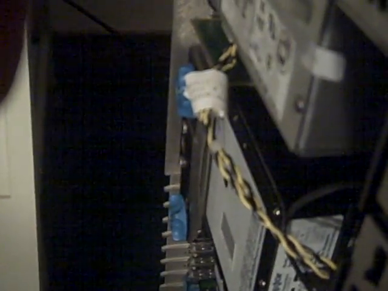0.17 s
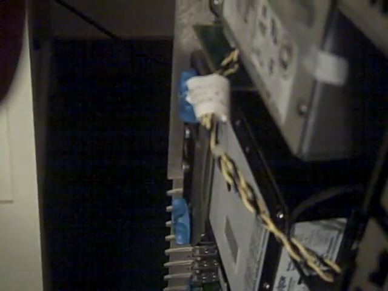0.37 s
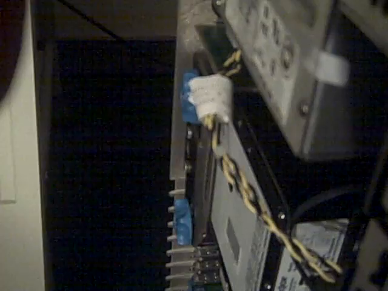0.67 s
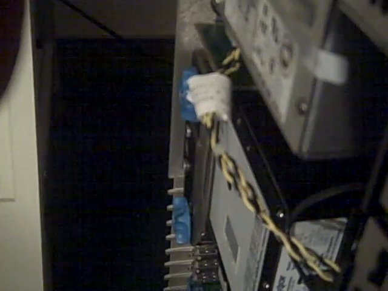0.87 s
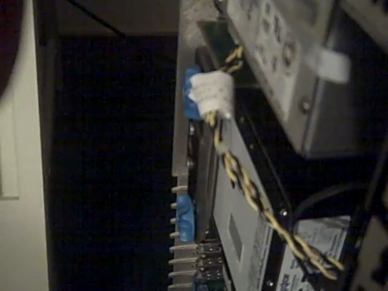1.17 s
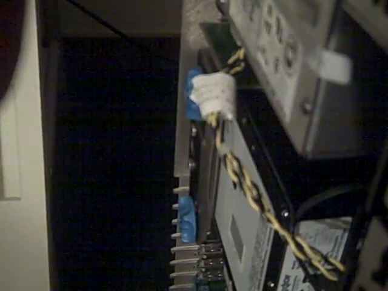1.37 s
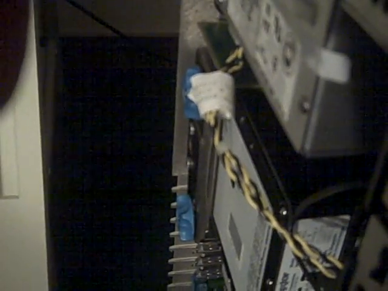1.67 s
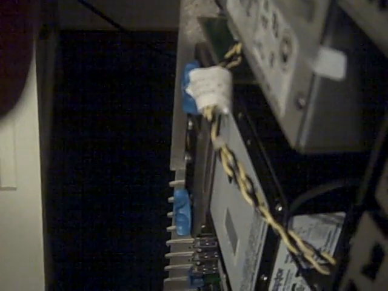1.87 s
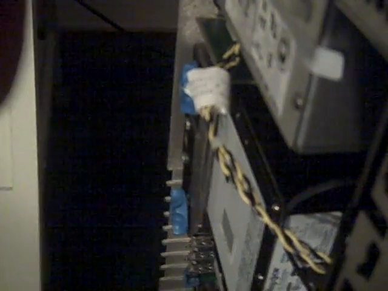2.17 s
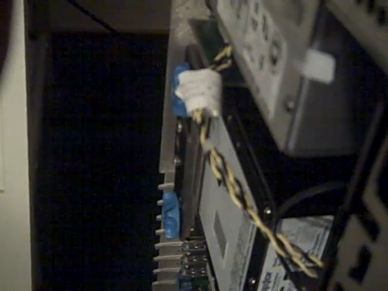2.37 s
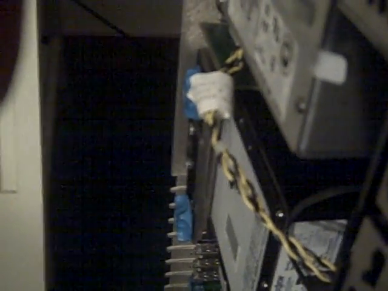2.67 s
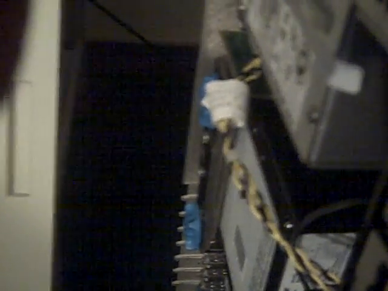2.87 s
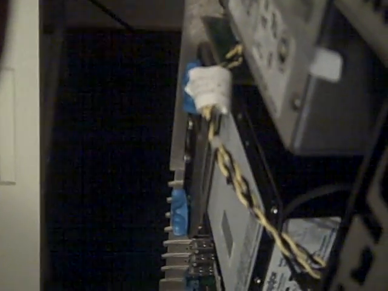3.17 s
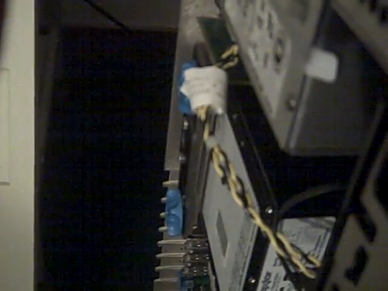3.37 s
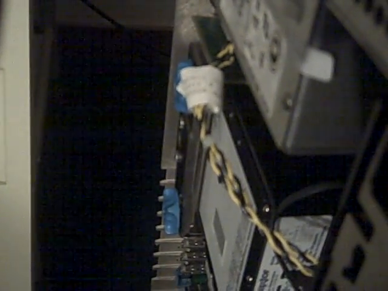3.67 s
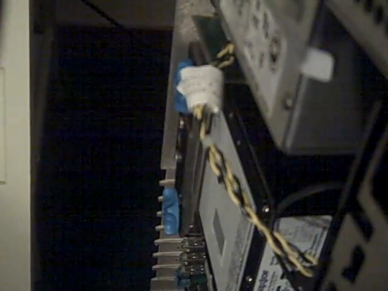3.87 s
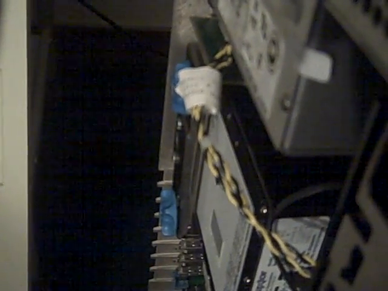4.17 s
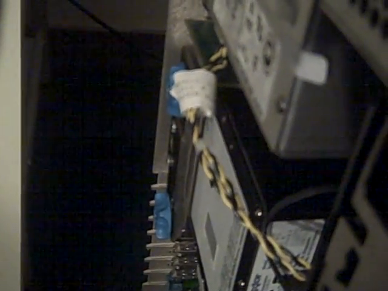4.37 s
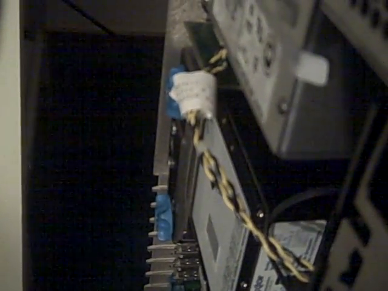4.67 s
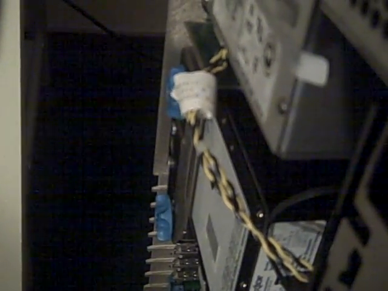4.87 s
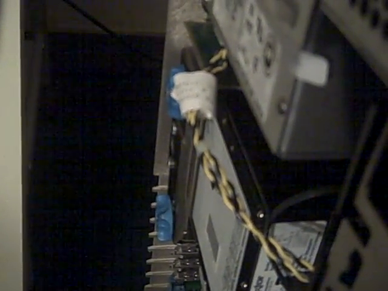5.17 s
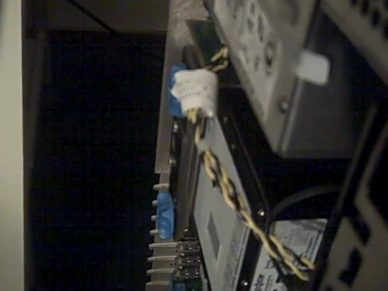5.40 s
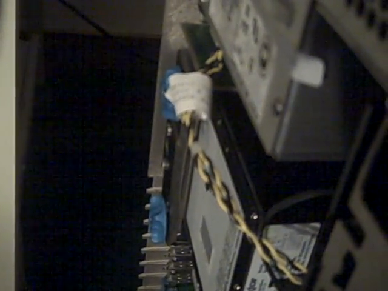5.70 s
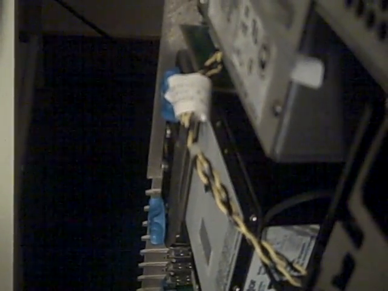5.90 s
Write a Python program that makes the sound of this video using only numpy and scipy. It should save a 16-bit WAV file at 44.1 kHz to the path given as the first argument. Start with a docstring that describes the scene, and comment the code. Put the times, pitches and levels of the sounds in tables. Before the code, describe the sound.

Close single microphone, small indoor room with a short reverb. Faint low room noise and a light press come before a hard, clattering switch click. The background ducks briefly and returns in tiny steps. Fan hum rises and levels into airy whoosh, a crisp latch tick cuts through, and later a drive motor whines upward with throbbing hiss.

```python
"""Desktop computer switched on

A finger presses the power switch of an open computer in a quiet room: filtered noise snaps and steel modes ring.
Two fans run up as gliding blade tones over rushing air; the hard drive ticks twice through its latch and cover,
then its spindle gathers speed as motor and bearing orders over a throbbing hiss. The gain control of a nearby
camera ducks at the snap and climbs back in small steps, each one a faint low thump."""
import sys
import numpy as np
from scipy import signal
from scipy.fft import rfft, irfft
from scipy.io import wavfile
from scipy.ndimage import uniform_filter1d

SR = 44100
rng = np.random.default_rng(int(sys.argv[2]) if len(sys.argv) > 2 else 0)


def wav_out(sig):
    """Save sig, one row per channel (or a flat mono array), as 16-bit PCM at SR to the path in sys.argv[1]."""
    wavfile.write(sys.argv[1], SR, np.round(np.clip(np.atleast_2d(sig).T, -1, 1) * 32767).astype(np.int16))


N = 266275
T = np.arange(N) / SR
HZ = np.fft.rfftfreq(N, 1 / SR) + 1e-3  # kept above zero for logs and divisions

# Colour of a hard snap, shared by switch and latch. Each row: frequency in Hz, relative density in dB per Hz.
SNAP_COLOUR = [(150, -34), (250, -10), (1020, -10), (1450, -6.5), (1910, -1), (2130, -9), (2530, -6.5),
               (3650, -15), (4570, -11), (5730, -16), (7980, -13.5), (12500, -26), (16000, -35)]


def undb(db):
    """Decibels to gain."""
    return 10 ** (np.asarray(db) / 20)


def level(x, db):
    """Scale to an rms level in dB."""
    return x * undb(db) / np.sqrt(np.mean(x ** 2))


def read(table, at):
    """Straight lines between (Hz, value) rows on a log frequency axis."""
    rows = np.array(table)
    return np.interp(np.log(at), np.log(rows[:, 0]), rows[:, 1])


def lifts(peaks, hz):
    """Gain of resonances, rows of (Hz, width Hz, lift dB), standing on a flat response."""
    return 1 + sum((undb(db) - 1) / (1 + (2 * (hz - f) / width) ** 2) for f, width, db in peaks)


def walk(rate):
    """Random levels held 1 / rate s and slewed twice; spread near 1."""
    hold = int(SR / rate)
    steps = np.repeat(rng.standard_normal(N // hold + 1), hold)
    return 1.3 * uniform_filter1d(uniform_filter1d(steps, hold), hold)[:N]


def coloured(gain):
    """Steady noise of the given colour, rms 1."""
    return level(irfft(rfft(rng.standard_normal(N)) * gain, N), 0)


def bands(gain, envelope):
    """Coloured noise in overlapping bands an octave apart, each under its own envelope(centre Hz)."""
    noise = rfft(rng.standard_normal(N)) * gain
    noise /= np.sqrt(2 * np.sum(np.abs(noise) ** 2)) / N  # rms 1 before the envelopes
    out = 0
    for hz in 20 * 2. ** np.arange(11):
        share = np.clip(1 - np.abs(np.log2(HZ / hz)), 0, 1)
        out = out + envelope(hz) * irfft(noise * share, N)
    return out


def burst(s, rise, decay):
    """Envelope that rises straight, holds for one more rise time and dies away exponentially."""
    t = T - s
    return np.clip(t / rise, 0, 1) * np.exp(-np.clip(t - 2 * rise, 0, None) / decay)


def tone(phase, db, waver_db=0.0):
    """A sine around rms level db that wavers slowly."""
    return np.sqrt(2) * undb(db + waver_db * walk(4.967)) * np.sin(phase + rng.uniform(0, 2 * np.pi))


def ring(push, modes, beat_db=0.):
    """Resonances that gather the energy of a rattling push and let it die away."""
    beats_per_s = 30  # rate of the wavering, where there is any
    out = 0
    for hz, db, t60 in modes:
        keep = np.exp(-2 * np.log(1000) / (t60 * SR))
        energy = signal.lfilter([.01], [1, -keep], push ** 2)
        gain = undb(db + beat_db * walk(beats_per_s))
        out = out + gain * np.sqrt(energy) * np.sin(2 * np.pi * hz * T + rng.uniform(0, 2 * np.pi))
    return out


def quiet_room():
    """Steady low-heavy noise with two faint resonant peaks, each band drifting a little in level."""
    # The room's colour. Each row: frequency in Hz, relative density in dB per Hz.
    colour = [(12, -44), (20, -10.5), (35, -14), (146, -20), (542, -26.5), (678, -12), (1000, -19),
              (2020, -21), (2530, -24.5), (3950, -27.5), (8890, -34), (10200, -33), (16000, -36)]
    # Faint hums in the noise. Each row: frequency in Hz, width in Hz, lift in dB.
    hums = [(479.5, 52, 16), (1950, 82, 9.5)]
    return undb(-66) * bands(undb(read(colour, HZ)) * lifts(hums, HZ), lambda hz: undb(0.79 * walk(3.5)))


def small_sounds():
    """Plunger squeaks and thin whistles are short sines; a low bump and faint rustles are shaped noise."""
    # Rubs of the plunger. Each row: start in seconds, level in dB, rise in seconds, decay in seconds.
    squeaks = [(.245, -64, .014, .005), (.868, -55, .0012, .003)]
    # Whistles that arch up and down. Each row: time at the top in seconds, top in Hz,
    # bend in Hz per second squared, half length in seconds, level in dB.
    whistles = [(3.11, 8400, 45000, .14, -85), (3.13, 9950, 40000, .14, -85),
                (5.58, 13650, 85000, .09, -87)]
    # A soft low bump: start in seconds, level in dB, centre in Hz.
    bump = (1.79, -64, 310)
    # Brief swells of treble hiss. Each row: centre in seconds, level in dB, length in seconds.
    rustles = [(1.86, -73, .13), (4.36, -73.5, .12), (5.4, -78, .06)]

    squeak_hz = 1950
    out = sum(burst(s, rise, decay) * tone(2 * np.pi * squeak_hz * T, db) for s, db, rise, decay in squeaks)
    for s, hz, bend, half, db in whistles:
        t = T - s
        arch = 2 * np.pi * (hz * t - bend * t ** 3 / 3)
        out = out + np.exp(-(t / half) ** 6) * tone(arch, db + 4 * walk(30))
    bump_s, bump_db, bump_hz = bump
    bump_noise = coloured(1 / (1 + ((HZ - bump_hz) / 70) ** 2))
    out = out + undb(bump_db) * burst(bump_s, 0.0133, 0.013) * bump_noise
    swell = sum(undb(db) * np.exp(-((T - s) / length) ** 2) for s, db, length in rustles)
    return out + swell * coloured(1 / (1 + ((HZ - 7000) / 3500) ** 2))


def latch():
    """Pushes of a few milliseconds ring the drive's small latch and its cover, with a thin bright edge."""
    # The two ticks. Each row: start in seconds, level in dB, share that reaches the cover in dB.
    ticks = [(1.5369, -22, -9), (3.004, -39, -7)]
    # Modes of the latch. Each row: frequency in Hz, relative level in dB, time to fall 60 dB in seconds.
    latch_modes = [(3760, 4.5, 0.006), (3790, -19, 0.1), (3874, -18, 0.089)]
    # Modes of the cover. Each row: frequency in Hz, relative level in dB, time to fall 60 dB in seconds.
    cover_modes = [(1430, -16.5, 0.18), (1620, -8.5, 0.094), (2200, 3.5, 0.018), (2800, -19, 0.062),
                   (3300, -3, 0.028), (5400, -11, 0.012)]
    edge_late_s, echo_db, echo_decay_s = .0017, -16.5, 0.02

    push = sum(undb(db) * burst(s, 0.0022, .0012) for s, db, _ in ticks)
    spread = sum(undb(db + cover_db) * burst(s, 0.001, 0.0007) for s, db, cover_db in ticks)
    edge_noise = undb(-16.5) * coloured(undb(read(SNAP_COLOUR, HZ)) * (HZ / (HZ + 12000)) ** 3)
    edge = np.roll(spread, int(edge_late_s * SR)) * edge_noise
    # the tick rattles on inside the case
    echo = sum(undb(db + cover_db + echo_db) * burst(s, 0.0023, echo_decay_s) for s, db, cover_db in ticks)
    echo = echo * coloured(1 / (1 + ((HZ - 3000) / 1800) ** 2))
    return ring(push, latch_modes) + ring(spread, cover_modes) + edge + echo


def drive():
    """Motor and bearing orders sweep up through the shell's resonances over a bearing hiss that rings them too."""
    # Colour of the shell. Each row: frequency in Hz, relative density in dB per Hz.
    colour = [(400, -24.5), (800, -4.5), (1100, -14.5), (1600, -6), (2500, -8.5), (3500, -7.5),
              (4300, -15.5), (6000, -24), (9000, -42)]
    # Resonances of the shell. Each row: frequency in Hz, width in Hz, lift in dB.
    resonances = [(1235, 94, 11), (1462, 47, 8.5), (1740, 23, 10), (1980, 60, 15), (2080, 70, 12),
                  (3000, 180, 8.5), (8100, 140, 26), (3300, 90, 19), (3720, 70, 19), (3840, 90, 19)]
    # the spindle gains speed evenly up to a knee, then its pull slowly fades
    start_s, gain_per_s2, knee_s, fade_s = 3.031, 42, 5.15, 5.3
    bearing_ratio = .884  # bearing orders per spindle order

    pull = (T > start_s) * gain_per_s2 * np.exp(-np.clip(T - knee_s, 0, None) / fade_s)
    turns = np.cumsum(pull) / SR  # per second
    phase = 2 * np.pi * np.cumsum(turns) / SR
    speed = turns / 120
    # three-phase motor: every third order stands out
    motor = sum(tone(k * phase, -15 + (4 if k % 3 == 0 else 0), 2.5) for k in range(18, 40))
    bearing = sum(tone(k * bearing_ratio * phase, -12, 2.5) for k in range(11, 24))
    shell = undb(read(colour, HZ)) * lifts(resonances, HZ)
    shell /= np.sqrt(np.mean(shell[HZ < 4000] ** 2))
    upper = 1 / (1 + (2700 / HZ) ** 10)  # the treble share
    whir = irfft(rfft(motor + bearing) * shell * (1 - .45 * upper), N) * speed ** 2.2
    # the treble of the hiss comes early and throbs three times a turn, at speed also once a turn
    throb = np.exp(1.1 * (np.cos(3 * phase) - 1) + .6 * speed * np.cos(phase))
    hiss = speed ** 1.18 * bands(shell * (1 - upper), lambda hz: undb(1.3 * walk(11)))
    hiss = hiss + undb(-4.5) * throb * speed ** 0.34 * coloured(shell * upper)
    return undb(-49) * (hiss + undb(-3) * whir)


def frame_db(hz):
    """How loud the first fan's frame sounds each pitch, in dB; it is deaf to the lowest."""
    # Resonances of the frame. Each row: frequency in Hz, width in Hz, lift in dB.
    resonances = [(482, 30, 7), (640, 140, 14), (750, 30, 9), (814, 44, 21.5), (867, 30, 24),
                  (1145, 64, 19)]
    base_db, low_hz = -73, 446
    return base_db + 20 * np.log10(lifts(resonances, hz) / (1 + (low_hz / hz) ** 12))


def fans():
    """Blade tones and rushing air; the air grows as a power of speed, the treble more steeply."""
    # The two fans. Each row: top blade rate in Hz, start in seconds, run-up time constant in seconds.
    run_ups = [(120.3, .57, .55), (150.6, .53, .58)]
    # Blade tones, one list per fan. Each row: multiple of the blade rate, level in dB
    # (on top of the frame's response for the first fan, at full speed for the second).
    blades = [
        [(4, 0), (5, -8), (6, -3), (8, -2), (9, -11), (10, -9), (11, -11)],
        [(1, -78), (2, -67), (3, -70), (5, -65), (6, -66), (7, -72)],
    ]
    # Colour of the rushing air. Each row: frequency in Hz, relative density in dB per Hz.
    air_colour = [(59, -72), (100, -28), (147, -18), (210, -16.5), (289, -9.5), (350, -14.5), (461, -7.5),
                  (513, -8.5), (930, -4), (1280, -5), (1680, -4), (2860, -5.5), (8830, -31.5),
                  (10700, -26.5), (16000, -45)]
    # Resonances in the air's path. Each row: frequency in Hz, width in Hz, lift in dB.
    ducts = [(510, 46, 3.5), (600, 73, 8.5), (897, 170, 8), (6690, 210, 6)]
    # Hiss of the power supply: centre in Hz, width in Hz, full-speed level in dB.
    supply_hiss = (10460, 800, -74.5)
    dropout_s, dropout_half_s, dropout_db = 3.26, 0.18, -21
    settle_s, settle_takes_s, settle_db = 3.615, 0.15, -11

    speeds = [np.clip(1 - np.exp(-(T - s) / tau), 1e-3, 1) for _, s, tau in run_ups]
    rates = [row[0] * speed for row, speed in zip(run_ups, speeds)]
    first, second = (2 * np.pi * np.cumsum(hz) / SR for hz in rates)
    # the tones of the first fan take turns as they glide through the resonances of its frame
    first_tones = sum(tone(k * first, db + frame_db(k * rates[0]), 1.1) for k, db in blades[0])
    # its seventh tone drops out for a moment, returns, then settles lower
    fade_db = dropout_db * np.exp(-((T - dropout_s) / dropout_half_s) ** 4)
    fade_db = fade_db + settle_db * np.clip((T - settle_s) / settle_takes_s, 0, 1)
    first_tones = first_tones + tone(7 * first, frame_db(7 * rates[0]) + fade_db, .5)
    second_tones = sum(tone(int(k) * second, db, 1.0) for k, db in blades[1])
    tones = first_tones * speeds[0] ** 2.8 + speeds[1] ** 8.5 * second_tones

    swell_db = .5 * walk(1.5)  # shared by all bands

    def rush(hz):
        """Growth of one band with speed, with a flicker of its own."""
        power = np.clip(2.45 + 1.06 * np.log2(hz / 1000), .5, 9)
        return speeds[1] ** power * undb(swell_db + walk(9.7))

    air = undb(-51.5) * bands(undb(read(air_colour, HZ)) * lifts(ducts, HZ), rush)
    hz, width, db = supply_hiss
    supply = undb(db) * speeds[1] ** 0.95 * coloured(1 / (1 + (2 * (HZ - hz) / width) ** 2))
    return tones + air + supply


def switch():
    """Each movement rattles briefly, rings the case and dies away in the room."""
    # Finger on the switch. Each row: start in seconds, level in dB, rise in seconds, tilt in dB per octave.
    presses = [(0.1847, -48, 0.000477, -2), (0.424, -46.5, .012, 0.5), (0.4823, -4.5, 0.0049, -0.9),
               (0.601, -45.5, 0.0039, -2)]
    # Modes of the steel case. Each row: frequency in Hz, relative level in dB, time to fall 60 dB in seconds.
    case_modes = [(610, -10, .18), (670, -17, .2), (770, -3, .1), (1270, -6, .2), (1500, -3, .08),
                  (1570, -5, .07), (1610, -45, 1.4), (1814, -43, 1.2), (1885, -3, .12), (2190, -16, .15),
                  (2590, -20, .12), (2420, -16, .1), (2735, -48, 2.4), (3195, -33, .45), (4550, -13, .07),
                  (5880, -24, .1), (6450, -47, .8), (6830, -7, .05), (7350, -8, .06), (8010, -11, .07)]
    # Decay of the room. Each row: frequency in Hz, time to fall 60 dB in seconds.
    room_t60 = [(400, .2), (1000, .21), (3000, .24), (8000, .21), (15000, .18)]
    rattle_s, room_low_hz = 0.0036, 420

    snaps, blow = 0, 0
    for s, db, rise, tilt_db in presses:
        colour = undb(read(SNAP_COLOUR, HZ) + tilt_db * np.log2(HZ / 2000))
        hit = undb(db) * burst(s, rise, rattle_s)
        snaps = snaps + hit * coloured(colour)
        blow = blow + hit
    case = undb(-16) * ring(blow, case_modes, beat_db=2.5)

    def tail(hz):
        """The room smooths the blow's power with a decay of its own in each band."""
        keep = np.exp(-2 * np.log(1000) / (read(room_t60, hz) * SR))
        near = signal.lfilter([.002], [1, -keep], blow ** 2)
        # a faint later part from the far walls lasts over twice as long
        far = signal.lfilter([.00003], [1, -keep ** .4], blow ** 2)
        return np.sqrt(near + far)

    # the case's modes colour the tail, each 110 Hz wide and lifted 6 dB
    tail_colour = undb(read(SNAP_COLOUR, HZ)) * lifts([(hz, 110, 6) for hz, _, _ in case_modes], HZ)
    tail_colour = tail_colour / (1 + (room_low_hz / HZ) ** 4)
    return snaps + case + undb(-13) * bands(tail_colour, tail)


def scene():
    """Everything as it reaches the one microphone."""
    return (quiet_room() + small_sounds() + latch() + drive() + fans() + switch())[None]


def record(dry):
    """The first loud peak cuts the gain at once; it holds, then climbs step by step. The amplifier's offset
    is scaled too, so every change thumps through the coupling capacitor."""
    limit, hold_s, step_s, steps, step_db = .12, .3895, .03415, 12, .45
    lopsided, bias, coupling_hz, top_hz, offset = .28, -.06, 1.9, 15800, -.0004

    cut = np.zeros(N)  # in steps
    loud = np.flatnonzero(np.abs(dry[0]) > limit)
    if len(loud):
        since = T - T[loud[0]]
        climbed = np.ceil(np.clip(since - hold_s, 0, None) / step_s)
        cut = (since > 0) * np.clip(steps - climbed, 0, None)
    gain = uniform_filter1d(undb(-step_db * cut), size=12)
    # the microphone bends loud sound more one way than the other
    bent = np.tanh(dry) + lopsided * np.tanh(dry) ** 2
    coupling = signal.butter(1, coupling_hz, "high", fs=SR)
    coupled = signal.lfilter(*coupling, gain * (bent + bias) - bias)
    # steep treble limit
    top = signal.ellip(10, .2, 70, top_hz, fs=SR, output="sos")
    return signal.sosfilt(top, coupled) + offset


dry = scene()
out = record(dry)
wav_out(out)
```